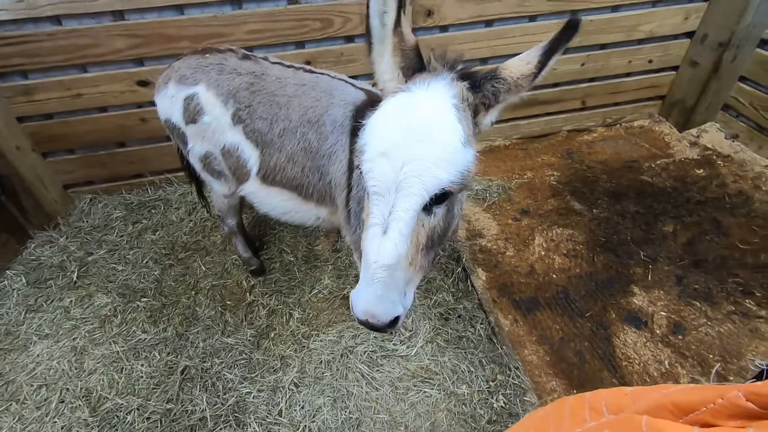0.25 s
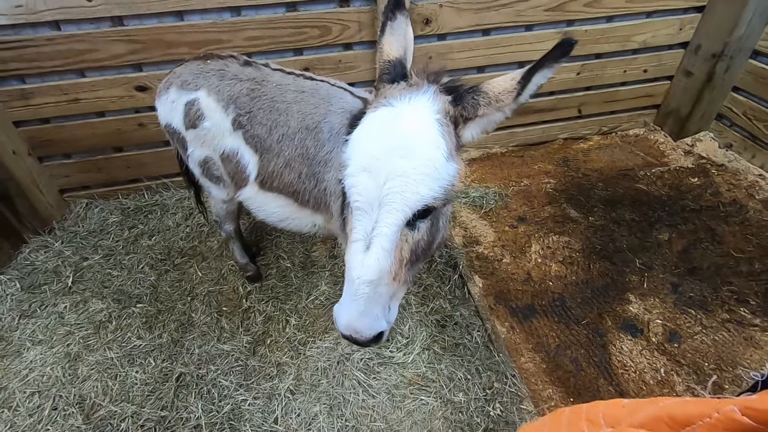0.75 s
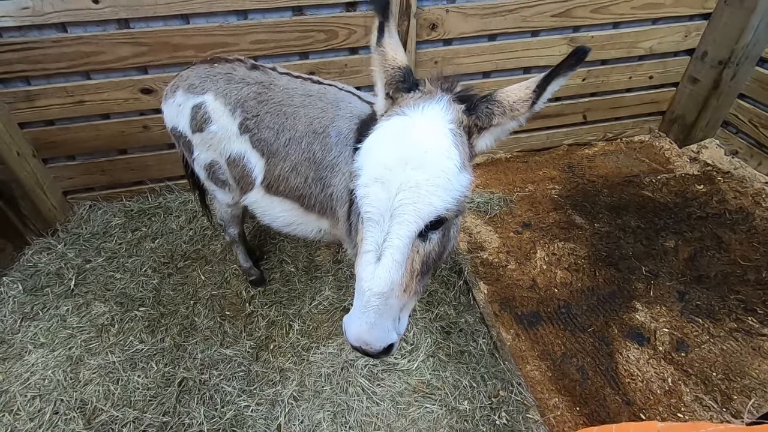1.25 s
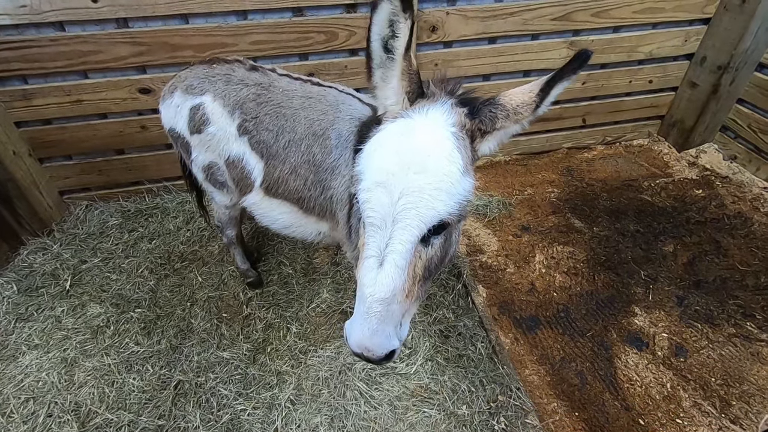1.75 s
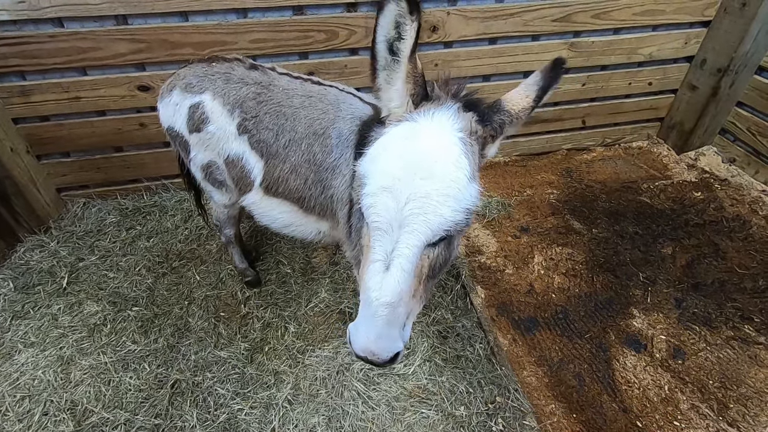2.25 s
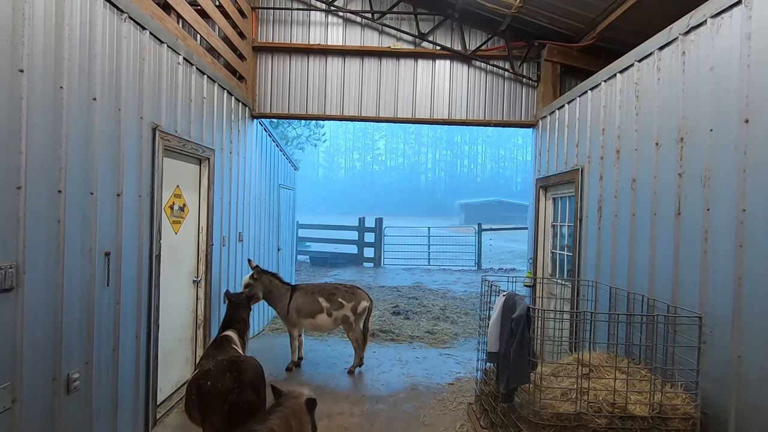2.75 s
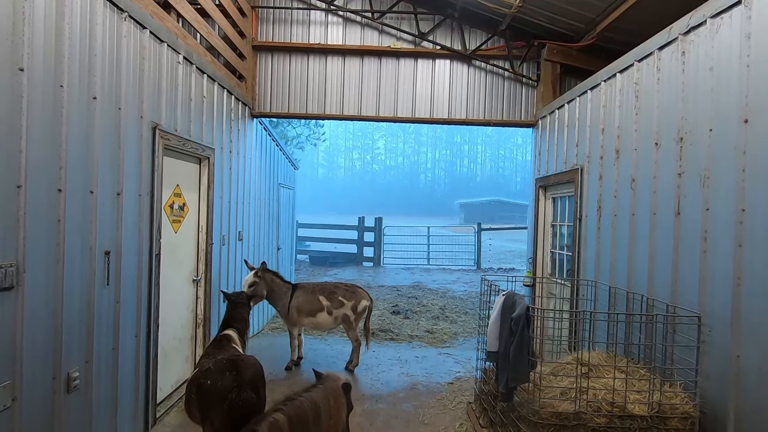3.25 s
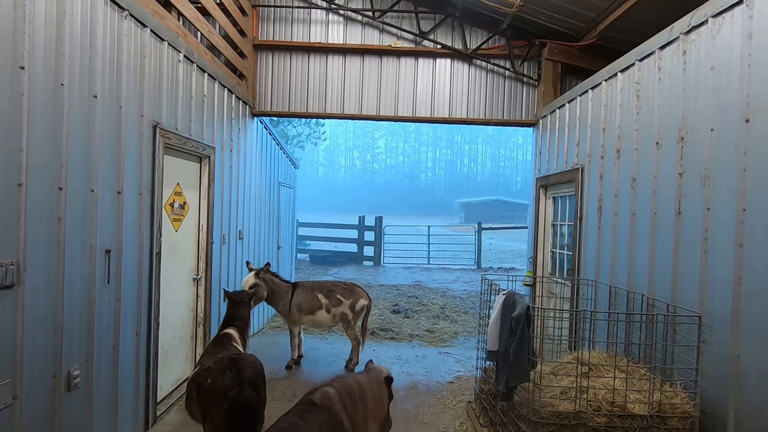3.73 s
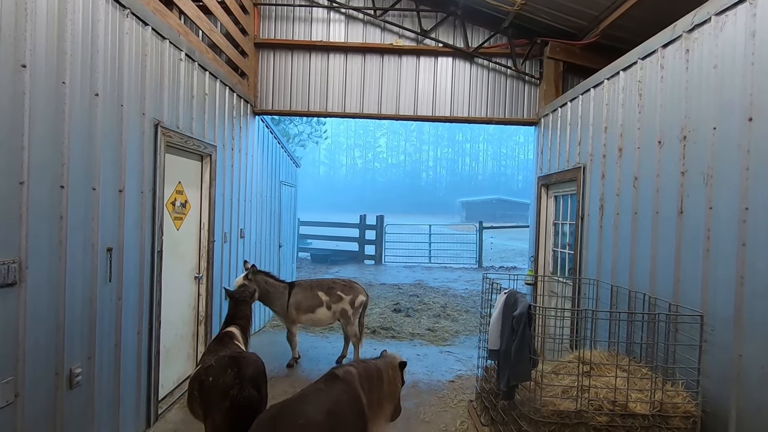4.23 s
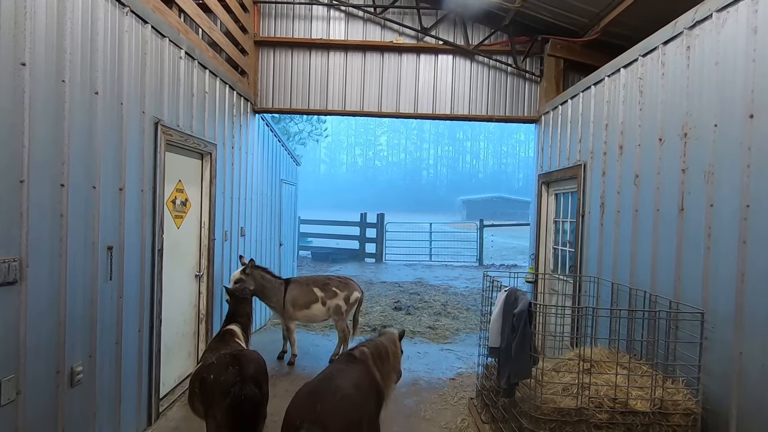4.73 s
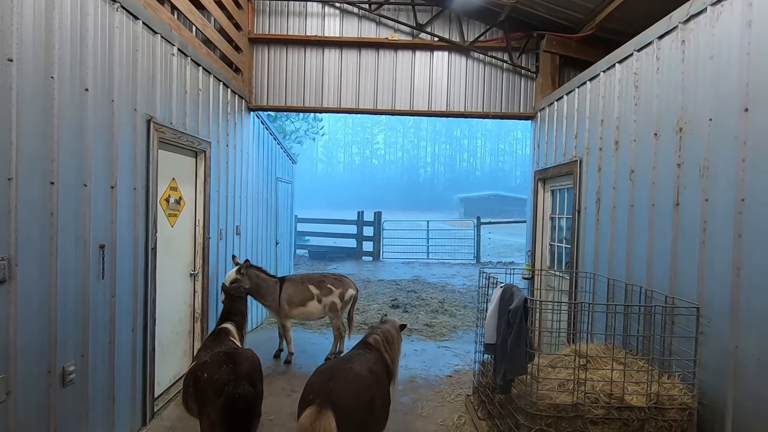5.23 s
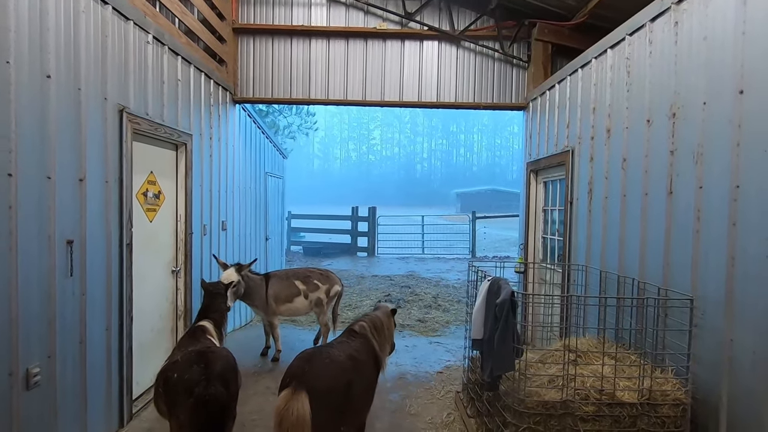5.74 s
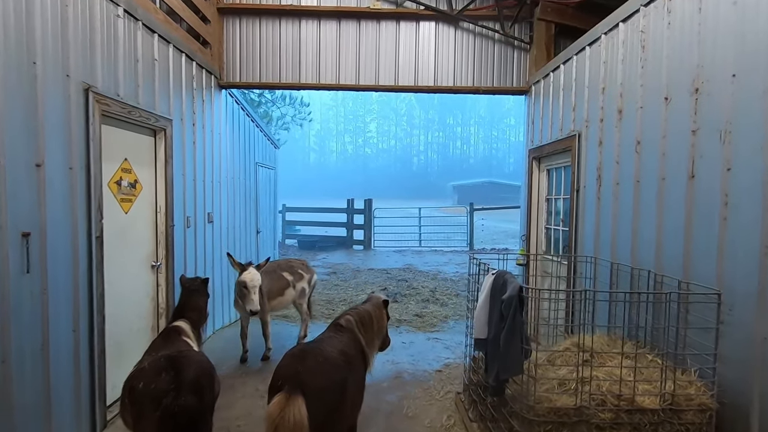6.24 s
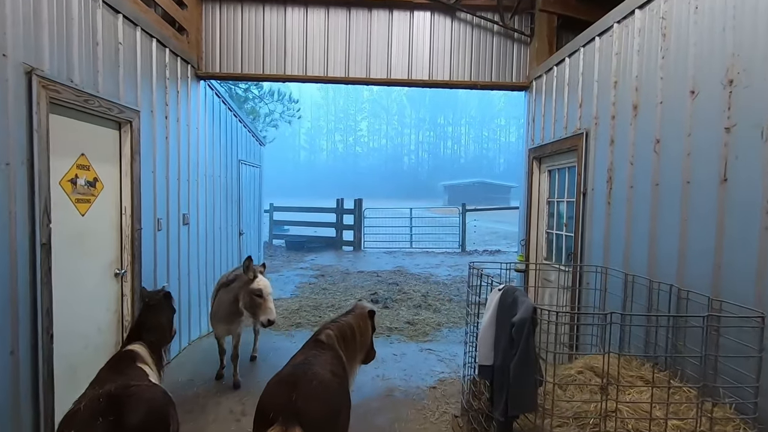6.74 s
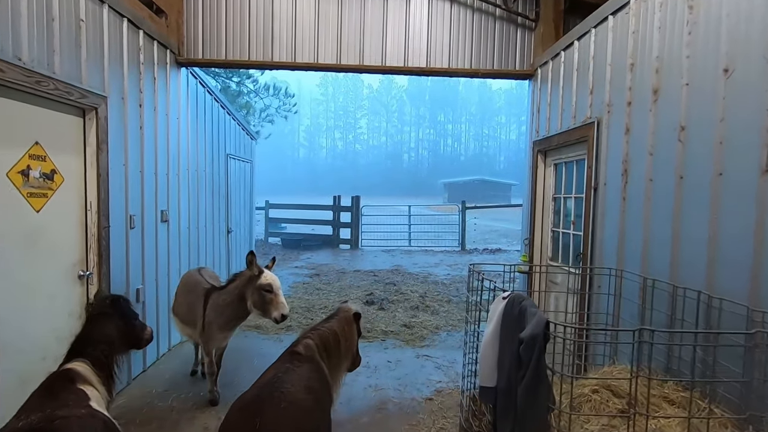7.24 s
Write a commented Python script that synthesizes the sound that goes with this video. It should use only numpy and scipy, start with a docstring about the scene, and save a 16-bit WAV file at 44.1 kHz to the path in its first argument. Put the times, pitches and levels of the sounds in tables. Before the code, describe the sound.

From 0 to about 2.4 s, a very quiet stall: a soft low drone and narrow wavering hum swell and sink under faint airy noise. Tiny close rustles cluster in the first half second and again around 0.8-1.0 s; a dry straw tick snaps near 0.7 s, with fainter ticks around 1.55 and 2.05 s. From about 0.9 s dull handling rumble appears, with soft low camera bumps between 1.05 and 1.95 s. A thin rising peep comes near 1.4 s, two barely audible ones around 1.7-1.85 s. The stall stops abruptly, leaving under a tenth of a second of silence. At about 2.5 s a much louder downpour rises quickly: dense drops on sheet metal form a steady, centred, low-heavy roar with panel boom, close patter and a fine hiss strengthening until 3.5 s. From 7.0 s the roar dips slightly while wide, bright open-air rain fades in, cut off mid-crossfade.

```python
"""A quiet barn stall comes first: a soft low drone and hum, faint rustles, ticks, thin peeps and camera bumps.
Then, after a blink of silence, the scene changes abruptly to the aisle in a downpour.
Thousands of drops a second drum on the sheet-metal roof and blur into a centred roar; a thin splash hisses on top.
At the very end the roar dips as a crossfade begins into wide, bright rain in the open.
Shaped noise makes drone and air, random tiny blows make rain and rustles, and sine waves make hum, peeps and bumps."""
import sys
import numpy as np
from scipy.fft import rfft, irfft, next_fast_len
from scipy.io import wavfile
from scipy.ndimage import uniform_filter1d, minimum_filter1d, map_coordinates

SR = 44100
rng = np.random.default_rng(int(sys.argv[2]) if len(sys.argv) > 2 else 0)


def bounce(signal):
    """Save signal as a 16-bit WAV file at the path given by the first command-line argument."""
    frames = np.transpose(np.atleast_2d(signal))
    limited = np.clip(frames, -1, 1)
    pcm = np.round(limited * 32767).astype(np.int16)
    wavfile.write(sys.argv[1], SR, pcm)


N = 329868

# All gains over frequency are relative: each layer is brought to rms 1 before its level is set.
# Answer of the roof sheets to a drop: (frequency [Hz], gain [dB])
ROOF_TONE = [(170, -45), (290, -1), (500, -2), (800, -5.5), (1280, -7.5), (1480, -11), (2200, -13.5),
             (2900, -16), (3600, -24.5), (4100, -26.5), (4700, -27.5), (5700, -39.5), (7000, -49.5),
             (10000, -77)]
# Broad modes of the roof panels: (centre [Hz], width [Hz], gain [dB])
PANEL_MODES = [(45.22, 17, -5.5), (73.5, 24, -8.5), (101, 4.8, -0.5), (129, 19.4, 1.5), (162, 40, -2),
               (214, 36, -2.5), (244.5, 30, -4.5)]
# Extra shaping of the panel boom: (frequency [Hz], gain [dB])
PANEL_SKIRTS = [(15, -30), (28, -8), (40, -5.0), (260, 3.0), (330, -1.0), (800, -25)]
# Tone of single drops right overhead: (frequency [Hz], gain [dB])
TAP_TONE = [(300, -3), (900, 0.5), (2800, -1), (3800, -10), (4800, -14.0),
            (5800, -26.0), (9000, -33.5), (14000, -48)]
# Tone of the fine spray: (frequency [Hz], gain [dB])
SPLASH_TONE = [(3000, -20), (5500, -4), (6800, -4), (8200, 0), (9800, -4.5), (12300, -5.5), (14000, -12),
               (15000, -22), (15600, -36)]
# Tone of rain in the open: (frequency [Hz], gain [dB])
OPEN_RAIN_TONE = [(200, -30), (500, -5), (1000, 2.5), (2000, 0.5), (3400, -4), (4800, -12.5), (6500, -14.5),
                  (7700, -12.5), (9000, -20), (10500, -31), (13000, -35), (15500, -45)]
# How alike left and right are in the aisle: (frequency [Hz], likeness [0 to 1])
AISLE_ALIKE = [(2600, 1), (3400, .996), (5000, .975), (9000, .98), (10500, .97), (12000, .2), (15000, .05)]
# How alike left and right are in the open: (frequency [Hz], likeness [0 to 1])
OPEN_ALIKE = [(300, 0.94), (1000, 0.24), (7000, 0.34), (13000, 0.09)]

# Short rustles: (peak time [s], rise [s], fall [s], scrape level [dB], swish level [dB],
#                 resonance [Hz], resonance level [dB])
RUSTLE_STROKES = [(.041, .007, 0.024, -67, -78, 1830, -58), (.055, .012, 0.018, -66, -72, 4150, -69),
                  (.08, .005, .016, -72, -67, 7450, -65), (.105, .015, .03, -76, -71, 7300, -76),
                  (.12, 0.046, .045, -80, -85, 600, -64), (.16, .03, .025, -72, -71, 6950, -76),
                  (.221, .012, 0.023, -59, -67, 2080, -61), (.255, .015, .025, -68, -76, 3200, -72),
                  (.265, .02, .04, -75, -78, 6950, -77), (.375, .015, .02, -72, -85, 1750, -69),
                  (.445, .018, .02, -71, -86, 1800, -67), (.5, 0.065, .07, -76, -85, 3200, -71),
                  (.79, .03, .025, -73, -76, 1750, -69), (.885, .02, .025, -66, -69, 1650, -67),
                  (.93, 0.03, .025, -61, -66, 2600, -68), (.962, 0.025, .03, -59.5, -57.5, 7800, -69),
                  (.98, .04, .03, -70, -76, 1620, -65), (.996, .014, .018, -62, -68, 6700, -71)]
# Dull part of a rustle: (frequency [Hz], gain [dB])
SCRAPE_TONE = [(200, -7), (600, -3), (1050, -6), (1300, -1), (1650, -1), (2200, -11), (3000, -10),
               (4100, -15), (5600, -22), (9000, -28), (13000, -50)]
# Bright part of a rustle: (frequency [Hz], gain [dB])
SWISH_TONE = [(500, -40), (2000, -13), (4500, -4.5), (5600, -7), (6600, 0), (7900, -4), (9200, -11),
              (10500, -19), (13000, -38), (15000, -70)]
# How alike left and right are for rustles close by: (frequency [Hz], likeness [-1 to 1])
CLOSE_ALIKE = [(300, .3), (700, -0.39), (1500, -0.33), (3100, 0.39), (7000, 0.13)]
# Soft knocks on the camera: (peak time [s], pitch [Hz], length [s], level [dB])
KNOCKS = [(0.108, 95, .028, -56.5), (1.052, 27.2, 0.034, -48), (1.285, 30.6, .025, -54),
          (1.696, 40, .014, -52), (1.945, 62, 0.0063, -49)]
# Dry ticks in the straw: (time [s], centre [Hz], width [octaves], decay [s], level [dB])
STRAW_TICKS = [(0.6845, 3570, 0.36, 0.0016, -52), (.6872, 2000, .9, .0015, -56),
               (1.558, 4000, .4, .005, -67), (2.055, 7000, .5, .0025, -65)]
# How alike left and right are for ticks: (frequency [Hz], likeness [0 to 1])
TICK_ALIKE = [(3000, .85), (7000, .4)]
# Thin peeps: (middle time [s], middle pitch [Hz], glide [Hz per s], length [s], level [dB])
PEEP_NOTES = [(1.375, 7200, 4500, .028, -69), (1.725, 6370, 0, .035, -83), (1.84, 7020, 600, .06, -83)]
# Tone of the handling rumble: (frequency [Hz], gain [dB])
RUMBLE_TONE = [(15, -25), (27, -1), (42, 11), (65, -20), (110, -25), (200, -42), (600, -120)]
# How alike the two microphone ports are for the rumble: (frequency [Hz], likeness [-1 to 1])
RUMBLE_ALIKE = [(50, -0.26)]

# Level of the hum, before its trim and flutter: (time [s], level [dB])
HUM_LEVEL = [(0, -72), (.09, -58), (.24, -61), (.3, -72), (.47, -68), (.55, -74), (.88, -59), (1.17, -57),
             (1.26, -75), (1.41, -57), (1.55, -73), (1.62, -57), (1.85, -60), (2.03, -60), (2.12, -66),
             (2.38, -71)]
# Tone of the low drone: (frequency [Hz], gain [dB])
DRONE_TONE = [(50, -42), (100, -25), (125, -14.5), (143, -6), (168, -1), (194, -4.5), (214, 0), (235, -6.5),
              (265, -6), (310, -22), (500, -66)]
# Level of the drone, before its trim: (time [s], level [dB])
DRONE_LEVEL = [(0, -64), (.1, -58.5), (.27, -61), (.42, -62), (.51, -57), (.66, -65), (.8, -57), (.95, -69),
               (1.1, -56.5), (1.27, -63), (1.4, -57), (1.55, -63.5), (1.66, -59), (1.84, -63), (2.1, -64),
               (2.38, -63.5)]
# Tone of the low mids: (frequency [Hz], gain [dB])
LOW_MID_TONE = [(190, -19), (280, 2.5), (315, -0.5), (350, -7.5), (388, -1.5), (408, -9), (428, -2),
                (460, -6.5), (495, -7), (640, -9.5), (900, -17), (1700, -80)]
# Level of the low mids: (time [s], level [dB])
LOW_MID_LEVEL = [(0, -62.5), (.22, -60), (.39, -66.5), (.57, -58.5), (.74, -64), (.85, -66), (1, -64),
                 (1.06, -59), (1.27, -62), (1.42, -59), (1.52, -67), (1.6, -63), (1.73, -62), (1.88, -70),
                 (2.1, -65), (2.38, -69)]
# Tone of the faint air: (frequency [Hz], gain [dB])
AIR_TONE = [(90, -20), (180, -18), (350, -3.5), (570, -11.5), (950, -10.5), (1600, -10), (2500, -13.5),
            (3200, -15.5), (4500, -26), (6000, -26), (7400, -24.5), (9000, -34.5), (10300, -47),
            (11000, -66), (12000, -72)]
# Level of the faint air, before its flutter: (time [s], level [dB])
AIR_LEVEL = [(0, -62.5), (.2, -62), (.45, -62), (.85, -61), (1.06, -62.5), (1.6, -62), (1.9, -63),
             (2.05, -63.5), (2.38, -63.5)]
# How alike left and right are in the stall: (frequency [Hz], likeness [0 to 1])
STALL_ALIKE = [(50, .05), (130, 0.94), (260, 0.96), (500, 0.8), (1000, 0), (3000, 0.44), (7000, 0)]

STALL_END = 2.389  # s
RAIN_START, RAIN_RISE = 2.464, 0.075  # s, s
ROOF_DB = -24  # the roar, before the trims of rattle and boom
SPLASH_DB = -61  # the spray once it has risen
SPLASH_RISE_DB, SPLASH_RISE_S = 5.5, 1.05  # how far it comes up, and over how long
CROSSFADE_START, CROSSFADE_S = 7.016, 0.51  # s, s: from the roof into rain in the open
OPEN_DB, ROOF_DIP_DB = -33, -3  # full level of the open rain; the change of the roar meanwhile
GRIP_START, GRIP_RISE = 0.85, 0.12  # s, s: the hand starts to shift on the camera
STILL_DB, GRIP_DB = -86, -68  # middle level of the rumble before and after that
HUM_HZ, HUM_DB = 177, -1  # middle pitch of the hum; its trim
TOP_HZ = 15650  # nothing is kept from here up


def amp(db):
    """Turn decibels into a gain."""
    return 10 ** (np.asarray(db) / 20)


def unit(x):
    """Scale a sound to rms 1."""
    return x / np.sqrt(np.mean(x ** 2) + 1e-20)


def clock():
    """Give the time of each sample in seconds."""
    return np.arange(N) / SR


def ramp(start, length):
    """Stay at 0 before start, then rise evenly to 1 over length seconds."""
    return np.clip((clock() - start) / length, 0, 1)


def level_at(points):
    """Join (time, level) points with straight lines."""
    times, levels = np.transpose(points)
    return np.interp(clock(), times, levels)


def wobble(rate):
    """Draw a smooth random curve through rate random points a second."""
    knots = rng.standard_normal(int(N * rate / SR) + 4)
    return map_coordinates(knots, [np.arange(N) * rate / SR])


def along(points, hz):
    """Join (frequency, value) points on a logarithmic frequency axis."""
    f, v = np.transpose(points)
    return np.interp(np.log(hz + 1), np.log(f + 1), v)


def colour(tone):
    """Turn (frequency, dB) points into a gain for every frequency."""
    return lambda hz: amp(along(tone, hz))


def bell(centre_hz, width_hz):
    """Give the gain of one resonance, strongest at its centre."""
    return lambda hz: 1 / (1 + ((hz - centre_hz) / width_hz) ** 2)


def filtered(x, response):
    """Strengthen or weaken each frequency of a sound."""
    m = next_fast_len(N + SR // 2)  # spare room at the end
    hz = np.fft.rfftfreq(m, 1 / SR)
    return irfft(rfft(x, m) * response(hz), m)[..., :N]


def spread(pair, gain, alike):
    """Mix two unrelated signals into coloured stereo of rms 1 with the given left-right likeness."""
    def mid_side_gain(hz):
        turn = np.arccos(np.clip(along(alike, hz), -1, 1)) / 2
        return gain(hz) * np.array([np.cos(turn), np.sin(turn)])

    mid, side = filtered(pair, mid_side_gain)
    return unit(np.array([mid + side, mid - side]))


def rush(gain, alike):
    """Make smooth stereo noise of rms 1."""
    return spread(rng.standard_normal((2, N)), gain, alike)


def impacts(per_second, scatter_db):
    """Make two trains of randomly timed tiny blows of scattered size, at rms 1."""
    lands = rng.random((2, N)) < per_second / SR
    size = amp(scatter_db * rng.standard_normal((2, N)))
    direction = np.sign(rng.standard_normal((2, N)))
    return unit(lands * size * direction)


def barn(drops, wash_db):
    """Lay near drops over the smooth wash that far drops and wall echoes blur into."""
    return unit(drops + amp(wash_db) * rng.standard_normal((2, N)))


def panel_gain(hz):
    """Add the panel modes in power, because many panels ring independently."""
    power = 0
    for centre, width, db in PANEL_MODES:
        damping = (hz * width) ** 2
        power = power + amp(db) ** 2 * damping / ((centre * centre - hz * hz) ** 2 + damping)
    return np.sqrt(power) * amp(along(PANEL_SKIRTS, hz))


def roof_rain():
    """Drops rattle the sheets and keep the panels booming; the roar dips in the crossfade at the end."""
    drops = barn(impacts(per_second=6000, scatter_db=2.5), wash_db=1.5)
    rattle = spread(drops, colour(ROOF_TONE), AISLE_ALIKE)
    heavy_drops = barn(impacts(per_second=5000, scatter_db=2.0), wash_db=5)
    boom = spread(heavy_drops, panel_gain, AISLE_ALIKE)
    level_db = ROOF_DB + ROOF_DIP_DB * ramp(CROSSFADE_START, CROSSFADE_S)
    return amp(level_db) * (amp(-1.0) * rattle + amp(-2.5) * boom)


def near_drops(db=-43.0):
    """Single drops strike the sheets right overhead and patter within the roar."""
    drops = impacts(per_second=170, scatter_db=2.0)
    return amp(db) * spread(drops, colour(TAP_TONE), AISLE_ALIKE)


def splash(dull_hz=12400):
    """Fine spray from the wet yard hisses through the doorway; it rises, then holds."""
    drops = barn(impacts(per_second=9000, scatter_db=2), wash_db=10)
    spray = spread(drops, colour(SPLASH_TONE), AISLE_ALIKE)
    dull = filtered(spray, lambda hz: 1 / np.sqrt(1 + (hz / dull_hz) ** 20))
    risen = ramp(RAIN_START, SPLASH_RISE_S)
    level_db = SPLASH_DB - SPLASH_RISE_DB * (1 - risen)
    top_fade = risen ** 4  # the highest treble fades in last
    return amp(level_db) * (dull + top_fade * (spray - dull))


def open_rain():
    """Separate drops make wide, bright rain in the open, which fades in by the crossfade at the end."""
    drops = impacts(per_second=18000, scatter_db=4)
    patter = spread(drops, colour(OPEN_RAIN_TONE), OPEN_ALIKE)
    return amp(OPEN_DB) * ramp(CROSSFADE_START, CROSSFADE_S) * patter


def slips(tone):
    """Many tiny slips close by blend into a rough, coloured noise."""
    return spread(impacts(per_second=5500, scatter_db=1.0), colour(tone), CLOSE_ALIKE)


def rustles(ring_width_hz=180):
    """Each rustle is a swell of tiny slips, dull and bright, with noise around a resonance of its own."""
    t, scrape, swish, ring = clock(), np.zeros(N), np.zeros(N), np.zeros((2, N))
    for s, rise, fall, scrape_db, swish_db, ring_hz, ring_db in RUSTLE_STROKES:
        stroke = np.exp(-((t - s) / np.where(t < s, rise, fall)) ** 2)
        scrape += amp(scrape_db) * stroke
        swish += amp(swish_db) * stroke
        ring += amp(ring_db) * stroke * rush(bell(ring_hz, ring_width_hz), CLOSE_ALIKE)
    catching = amp(1.0 * wobble(90.0))  # quick, slight unevenness
    return catching * (scrape * slips(SCRAPE_TONE) + swish * slips(SWISH_TONE) + ring)


def thumps(port_lag_turns=0.27):
    """A knock on the camera body is a brief low swing, out of step at the two microphone ports."""
    out = np.zeros((2, N))
    for s, hz, length, db in KNOCKS:
        t = clock() - s
        turns = hz * t + rng.random() + np.array([[0], [port_lag_turns]])
        out += amp(db) * np.exp(-(t / length) ** 2) * np.sin(2 * np.pi * turns)
    return out


def ticks(attack_s=.0003):
    """A stalk snaps: a sudden burst of noise around one pitch that dies in a few milliseconds."""
    out = np.zeros((2, N))
    for s, centre_hz, octaves, decay, db in STRAW_TICKS:
        band = rush(lambda hz: np.exp(-(np.log2((hz + 1) / centre_hz) / octaves) ** 2), TICK_ALIKE)
        fade = np.exp(-np.abs(clock() - s) / decay)
        out += amp(db) * ramp(s, attack_s) * fade * band
    return out


def peeps(blur_hz=110, blurs_per_second=400):
    """Thin high tones, some gliding upward, have their pitch blurred by the barn's echoes."""
    out = np.zeros((2, N))
    blur = blur_hz * np.array([wobble(blurs_per_second), wobble(blurs_per_second)])
    for s, hz, glide, length, db in PEEP_NOTES:
        t = clock() - s
        turns = np.cumsum(hz + glide * t + blur, axis=1) / SR
        swell = np.exp(-(t / length) ** 2)
        out += amp(db) * swell * np.sqrt(2) * np.sin(2 * np.pi * turns)
    return out


def handling(lumpy_db=4, lumps_per_second=16):
    """Once the hand shifts on the camera, a dull lumpy rumble shakes the two microphone ports differently."""
    level_db = STILL_DB + (GRIP_DB - STILL_DB) * ramp(GRIP_START, GRIP_RISE)
    lumps_db = lumpy_db * wobble(lumps_per_second)
    return amp(level_db + lumps_db) * rush(colour(RUMBLE_TONE), RUMBLE_ALIKE)


def hum(waver_hz=4.5, wavers_per_second=11, flutter_db=2.0):
    """A narrow hum, one sine wave, stands out of the drone; it wavers in pitch, swells and sinks."""
    turns = np.cumsum(HUM_HZ + waver_hz * wobble(wavers_per_second)) / SR
    level_db = HUM_DB + level_at(HUM_LEVEL) + flutter_db * wobble(wavers_per_second)
    return amp(level_db) * np.sqrt(2) * np.sin(2 * np.pi * turns)


def stall_layer(tone, level):
    """Shaped noise swells and sinks along its own level curve."""
    return amp(level_at(level)) * rush(colour(tone), STALL_ALIKE)


def stall(drone_db=3.0, air_flutter_db=0.5, flutters_per_second=22):
    """Three bands of noise make a low drone, the low mids above it and faint, uneven air."""
    drone = amp(drone_db) * stall_layer(DRONE_TONE, DRONE_LEVEL)
    low_mids = stall_layer(LOW_MID_TONE, LOW_MID_LEVEL)
    flutter = amp(air_flutter_db * wobble(flutters_per_second))
    air = flutter * stall_layer(AIR_TONE, AIR_LEVEL)
    return drone + low_mids + air


def scene():
    """The stall stops short; after a blink of silence the downpour comes in."""
    in_stall = np.clip((STALL_END - clock()) / 0.002, 0, 1)
    in_aisle = ramp(RAIN_START, RAIN_RISE) ** 2
    downpour = roof_rain() + near_drops() + splash() + open_rain()
    quiet = rustles() + thumps() + ticks() + peeps() + handling() + hum() + stall()
    return in_stall * quiet + in_aisle * downpour


def limiter(x, ceiling_db):
    """Dip the gain smoothly around any peak above the ceiling."""
    needed = np.minimum(1, amp(ceiling_db) / (np.abs(x).max(axis=0) + 1e-9))
    held = minimum_filter1d(needed, size=441)  # 10 ms window
    return x * uniform_filter1d(held, size=441)


def record(dry):
    """The camera holds down peaks and keeps nothing above its band limit."""
    held = limiter(dry, ceiling_db=-11.6)
    return filtered(held, lambda hz: hz < TOP_HZ)


dry = scene()
out = record(dry)
bounce(out)
```